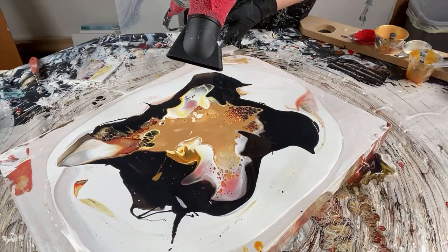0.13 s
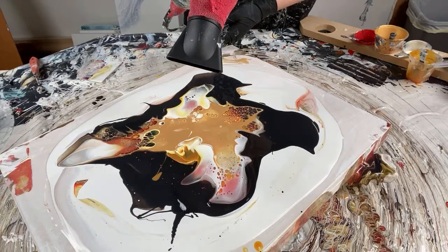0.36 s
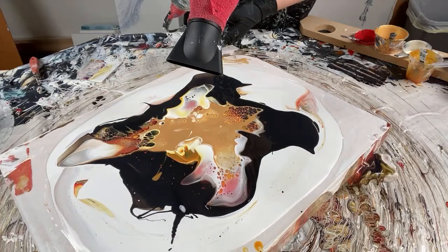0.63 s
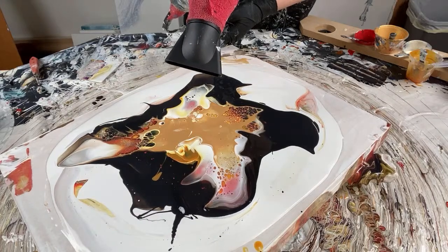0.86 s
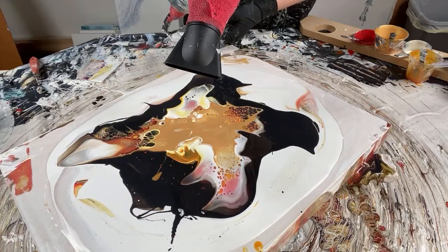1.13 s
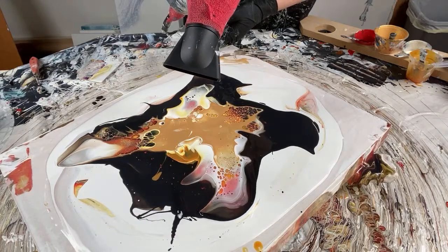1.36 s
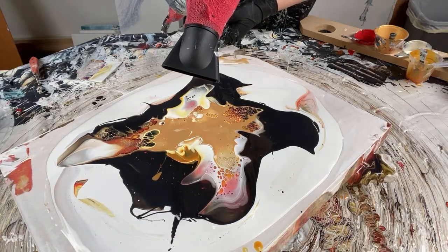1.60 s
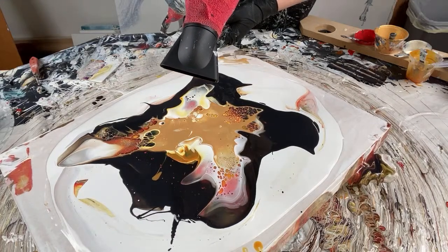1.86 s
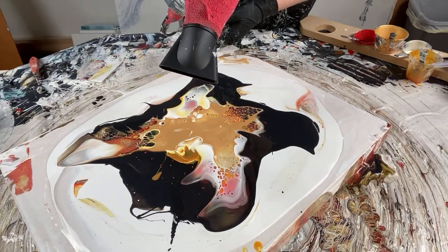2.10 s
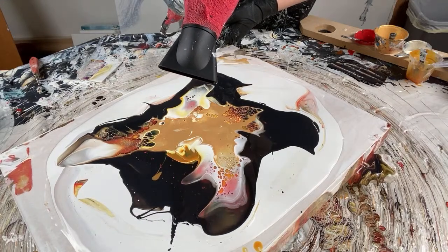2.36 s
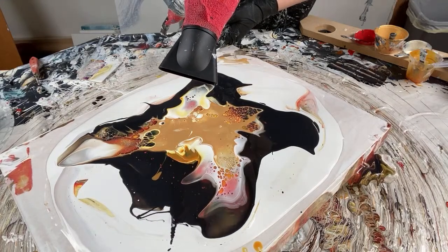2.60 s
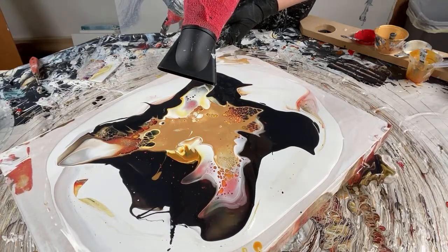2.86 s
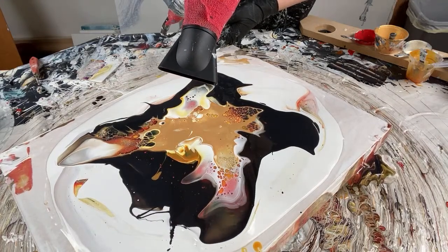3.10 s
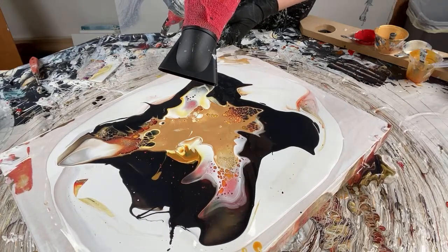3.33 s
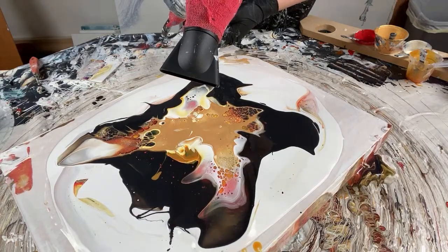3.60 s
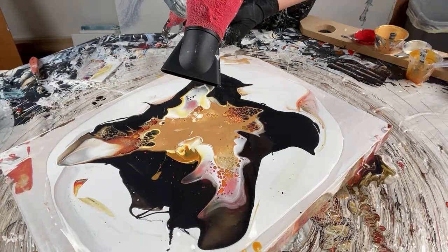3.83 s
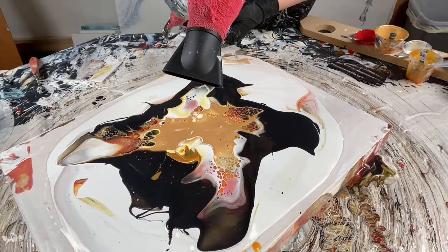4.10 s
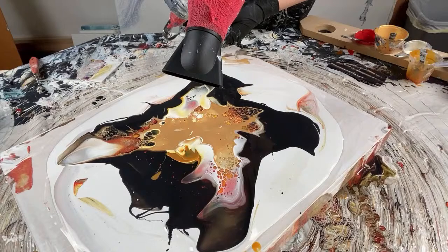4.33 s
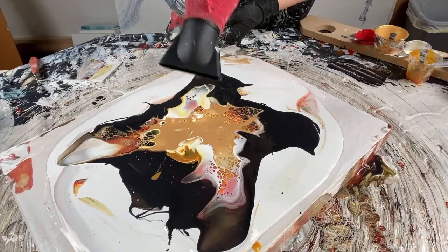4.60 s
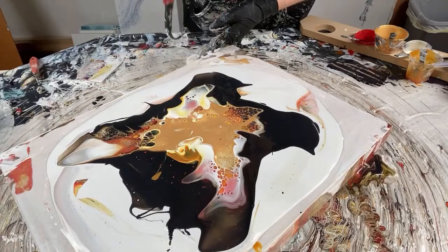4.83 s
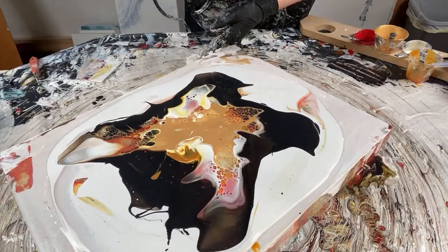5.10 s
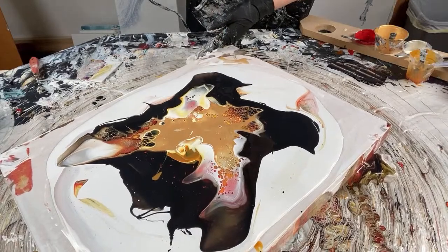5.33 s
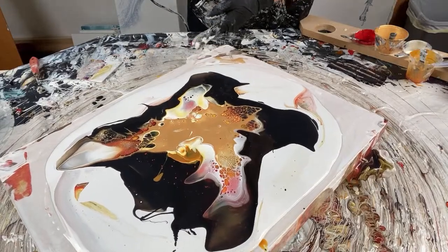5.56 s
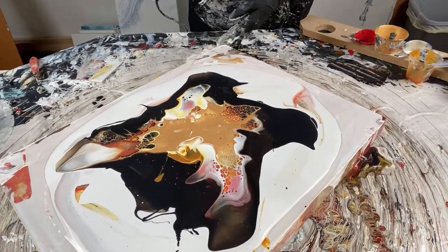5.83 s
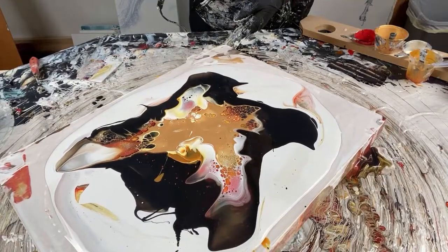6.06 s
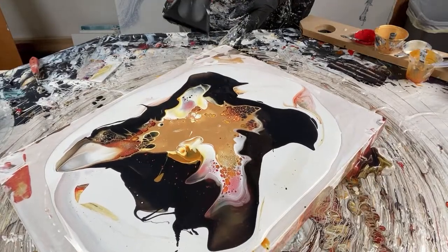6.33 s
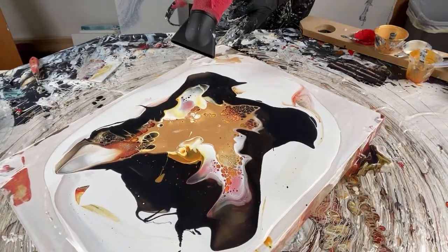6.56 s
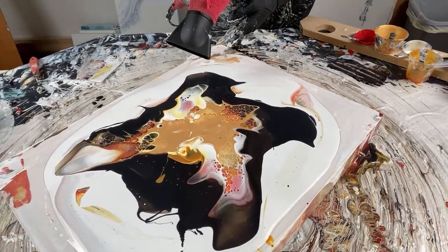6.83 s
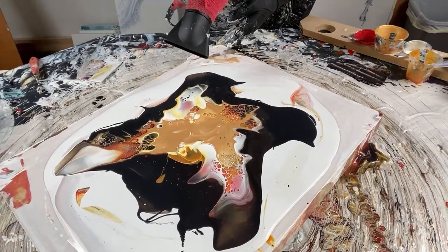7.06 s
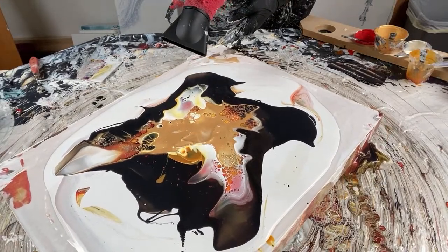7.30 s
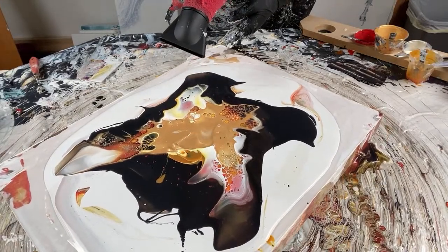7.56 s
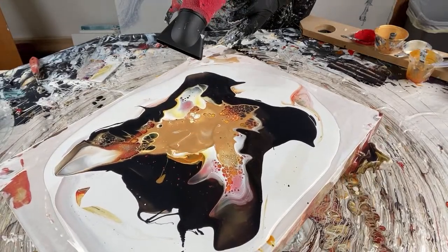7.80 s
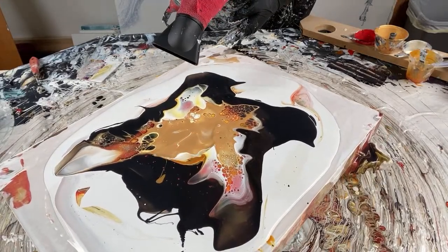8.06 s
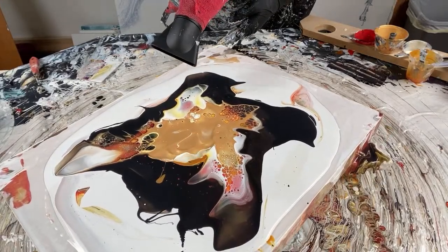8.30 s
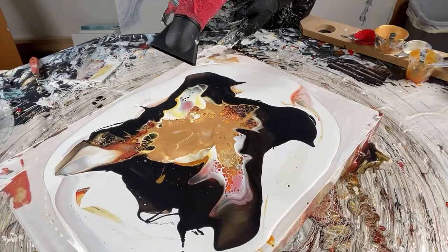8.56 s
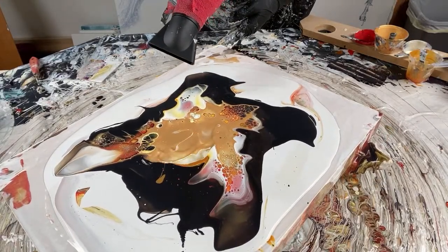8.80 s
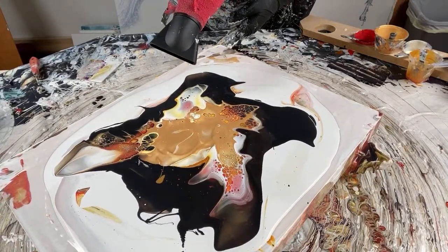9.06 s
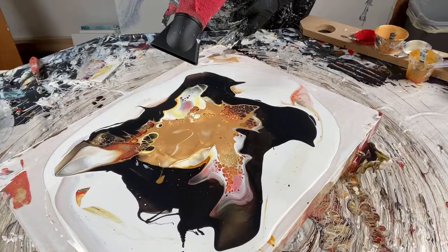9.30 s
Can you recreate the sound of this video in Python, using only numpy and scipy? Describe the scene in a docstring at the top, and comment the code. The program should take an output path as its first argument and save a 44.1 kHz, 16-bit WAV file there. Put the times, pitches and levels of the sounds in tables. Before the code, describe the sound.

A handheld hair dryer runs without pause in a small studio. Its hollow midrange roar and airy hiss stay steady for over four seconds, swell slightly and slide in tone as the nozzle swings away, then settle into a different colour and gradually soften. Faint motor whine, low fan rumble and barely audible mains hum sit beneath, heard by one centred microphone with a short room reverberation.

```python
"""A handheld hair dryer blows at a wet canvas on a table in a small studio, heard by one microphone.
It holds its first aim, is swung up and away, then is aimed again from another angle and slowly draws back.
Throughout, turbulence roars in the barrel's resonances and hisses in the jet, coloured by each attitude.
The motor whines faintly on multiples of its shaft speed, over a low fan rumble and a steady mains hum."""
import sys
import numpy as np
from scipy import signal
from scipy.io import wavfile
from scipy.ndimage import uniform_filter1d

SR = 44100
rng = np.random.default_rng(int(sys.argv[2]) if len(sys.argv) > 2 else 0)


def dump(signal):
    """Clip the signal to [-1, 1] and save it as 16-bit WAV at the path in sys.argv[1]."""
    limited = np.clip(np.atleast_2d(signal).T, -1, 1)
    pcm = np.round(limited * 32767).astype(np.int16)
    wavfile.write(sys.argv[1], SR, pcm)


def makeup_ratio(level_db):
    """Linear amplitude ratio for a level in decibels (20 dB per factor of ten)."""
    decades = np.asarray(level_db, float) / 20
    return 10 ** decades


N = 415422   # length in samples

# relative spectra of the barrel roar, one each for first aim, swung away, second aim: pitch_hz, level_db
ROAR_SPECTRA = [
    [(180, -47), (300, -22.5), (448, -6), (623, 0.5), (754, -3), (860, -3.5), (938, -8), (1350, -5.5),
     (1670, -16), (2000, -9), (2400, -25), (3120, -56), (5280, -120)],
    [(180, -47), (300, -20.5), (425, -11), (506, -0.5), (602, 1), (680, -4), (1390, -4.5), (1590, -13.5),
     (1930, -8.5), (2400, -20.5), (3120, -50), (5280, -120)],
    [(180, -52), (300, -20.5), (376, -21), (444, -9), (476, -18), (556, 0), (795, -0.5), (980, -12),
     (1080, -8.5), (2320, -18), (2400, -18.5), (3120, -51), (5280, -120)],
]
# relative spectra of the jet hiss, one each for first aim, swung away, second aim: pitch_hz, level_db
HISS_SPECTRA = [
    [(1350, -39), (2300, -8), (2700, -2), (2920, -1), (3740, -3.5), (4680, 1.5), (5230, 0), (5670, -4),
     (6390, -1), (7920, -9.5), (8930, -11), (11100, -16), (12500, -13.5), (13700, -17.5), (15500, -39)],
    [(1350, -31), (2300, -5), (2470, 1), (2850, -13), (2990, -3), (3430, -7), (4640, -4), (5070, -5),
     (6590, -4), (8310, -4.5), (10700, -16.5), (13900, -19), (15500, -29)],
    [(1350, -34), (2300, -24), (2530, 6), (2760, -3.5), (3140, -2.5), (3680, -7), (3990, -2.5), (4320, -6),
     (6490, -3.5), (7670, -7), (8380, -1), (9370, -14), (13100, -21), (14400, -19), (15500, -29)],
]
# narrow ridges and hollows of barrel and table: centre_hz, width_hz, first_db, away_db, second_db
BARREL_RIDGES = [(443, 18, 2, -4, 0.5), (617, 41, 1.5, -1.5, -2.5), (860, 15, 3.5, -4.5, -3.5),
                 (1050, 58, 0.5, -2, 0.5), (1326, 29, 2, -1, 0.5), (1800, 58, -5, -3, -3),
                 (2050, 25, 3.5, -5, 4.5), (2102, 36, -6.5, 5.5, -2.5), (2260, 55, -2.5, -5, -8),
                 (2550, 45, 3, 0.5, 2.5), (2750, 50, 0.5, 7.5, -1.5), (2960, 110, 3, -1, 1)]
# ridges (+) and hollows (-) that glide while the nozzle swings and the echo off the table changes its path:
# start_s, end_s, from_hz, to_hz, level_db
GLIDING_RIDGES = [(4.4, 4.7, 2050, 1600, 3), (4.7, 6.34, 1140, 1360, 3), (5.2, 6.05, 1000, 1050, 1.5),
                  (4.78, 5.22, 10300, 15200, 6), (4.85, 5.2, 2700, 3000, -5), (5.1, 5.62, 3350, 3670, -7),
                  (5.1, 5.75, 7900, 8600, 2), (5.0, 5.8, 6200, 7100, 3), (5.3, 6.3, 15000, 8400, 4),
                  (5.3, 7.6, 8800, 8250, 3), (5.75, 6.8, 14400, 11000, 4), (5.8, 6.6, 456, 890, 3.5),
                  (5.76, 6.15, 2400, 2700, 5.5), (6.0, 6.45, 2750, 3200, 1), (5.85, 6.5, 1620, 2040, 4)]
# motor and fan whine: multiple (of the shaft speed), first_db, second_db
WHINE_TONES = [(1, -63, -64), (9, -62, -55), (10, -61, -61), (12, -65, -63), (18, -62, -62), (24, -68, -64),
               (27, -63, -65), (36, -67, -64)]
# relative spectrum of the fan's low rumble: pitch_hz, level_db
RUMBLE_SPECTRUM = [(24, -36), (45, -32), (85, -16.5), (140, -7.5), (220, -0.5), (300, -0.5), (360, -2.5),
                   (500, -27.5)]
# mains hum: pitch_hz, level_db
HUM_TONES = [(60, -71), (120, -64)]

# loudness by attitude, in dB: first aim, swung away, second aim
ROAR_DB, HISS_DB, RUMBLE_DB = (-27, -23.5, -25.5), (-34.8, -34.5, -35), (-48, -46, -48.5)
# the swing: lifted off, furthest away, starting back, settled again
LIFT_S, FURTHEST_S, BACK_S, SETTLE_S = 4.7, 5.36, 5.47, 6.45
# the turn into the second aim: begins, complete; the share of that aim then held
TURN_S, AIMED_S, AIM_SHARE = 5.88, 6.25, 0.58
SINK_DB_PER_S = 0.37    # once settled, the dryer slowly draws back
RUMBLE_LAG_S = 0.31     # the rumble swells later than the roar
GLIDE_WIDTH = 0.048     # share of the centre frequency
GLIDE_FADE = 0.16       # share of its length over which a glide fades in, and out
RIPPLE = 0.045          # share by which the mains ripples the hiss
SHAFT_HZ = 243.9
ROOM_DB, ROOM_T60_S, WALL_CUT_HZ = -13, 0.41, 7100
NOTCH_HZ, NOTCH_WIDTH_HZ, NOTCH_DB = 7830, 180, -4
FRAME = 2048            # samples per spectral frame, overlapping by three quarters


def barrel_roar(t):
    """Resonance: the barrel reinforces some bands of the turbulence blown through it."""
    level_db = by_attitude(*ROAR_DB, t) - sink_db(t)
    return air(ROAR_SPECTRA, level_db, ridges_db, gust_db=0.43)


def jet_hiss(t):
    """Jet noise: turbulent mixing radiates a broad treble, amplitude-modulated at the mains frequency."""
    level_db = by_attitude(*HISS_DB, t) - sink_db(t)
    hiss = air(HISS_SPECTRA, level_db, ridges_db, gust_db=0.45)
    mains_hz = HUM_TONES[0][0]
    return hiss * (1 + RIPPLE * np.sin(2 * np.pi * mains_hz * t))


def motor_whine(t):
    """Harmonics of rotation: an unsteady shaft drives tones that swell and fade as the hand moves."""
    shaft_hz = SHAFT_HZ * (1 + 0.000586 * drift(1.5, size=N))
    turns = np.cumsum(shaft_hz) / SR
    share_second = attitude(t)[1]
    whine = np.zeros(N)
    for multiple, first_db, second_db in WHINE_TONES:
        level_db = first_db + share_second * (second_db - first_db) + 2.7 * drift(1.5, size=N)
        phase = 2 * np.pi * (round(multiple) * turns + rng.random())
        whine += np.sqrt(2) * makeup_ratio(level_db) * np.sin(phase)
    return whine


def fan_rumble(t):
    """Low-frequency flow noise: one spectrum serves every attitude, and only its level follows the swing."""
    level_db = by_attitude(*RUMBLE_DB, t - RUMBLE_LAG_S)
    return air([RUMBLE_SPECTRUM] * 3, level_db, lambda hz, s: 0, gust_db=0.2)


def mains_hum(t):
    """Mains induction: steady sinusoids, their levels given as rms."""
    return sum(np.sqrt(2) * makeup_ratio(db) * np.sin(2 * np.pi * hz * t) for hz, db in HUM_TONES)


def studio(x):
    """Reverberation: a dense, exponentially dying tail joins the direct sound and ripples its spectrum."""
    t = np.arange(SR // 2) / SR
    tail = rng.standard_normal(len(t)) * makeup_ratio(-60 * t / ROOM_T60_S)
    tail = tail * (t > 0.004)   # the tail starts after the direct sound
    # the walls absorb the treble
    tail = signal.lfilter([1], [1, -np.exp(-2 * np.pi * WALL_CUT_HZ / SR)], tail)
    tail = makeup_ratio(ROOM_DB) * tail / np.sqrt(np.sum(tail ** 2))
    led_in = np.r_[x[len(t):0:-1], x]   # so the room is already ringing at the start
    wet = signal.fftconvolve(led_in, tail)[len(t):len(t) + N]
    return x + wet


def air(spectra, level_db, lift_db, gust_db, patchy_db=0.5):
    """Filtered turbulence: white noise takes a colour that blends between the three attitudes."""
    overlap = FRAME * 3 // 4
    hz, s, white = signal.stft(rng.standard_normal(N), SR, nperseg=FRAME, noverlap=overlap)
    spectra_db = [at_hz(points, hz)[:, None] for points in spectra]
    colour = makeup_ratio(by_attitude(*spectra_db, s) + lift_db(hz[:, None], s))
    colour = colour / np.sqrt(np.mean(colour ** 2, axis=0))   # the colour leaves the level alone
    colour = colour * makeup_ratio(patchy_db * eddies(colour.shape))
    noise = signal.istft(white * colour, SR, nperseg=FRAME, noverlap=overlap)[1][:N]
    return noise * makeup_ratio(level_db + gust_db * drift(60, size=N))   # the flow flutters


def ridges_db(hz, s):
    """Interference and resonance: the gliding ridges fade in and out over the fixed ones."""
    out = barrel_db(hz, s)
    for start_s, end_s, from_hz, to_hz, top_db in GLIDING_RIDGES:
        done = np.clip((s - start_s) / (end_s - start_s), 0, 1)
        centre_hz = from_hz + done * (to_hz - from_hz)
        fade = np.minimum(np.minimum(done, 1 - done) / GLIDE_FADE, 1)
        out = out + top_db * fade * bell(hz, centre_hz, GLIDE_WIDTH * centre_hz)
    return out


def barrel_db(hz, s):
    """Directivity: each fixed ridge or hollow is as strong as the attitude lets it reach the microphone."""
    return sum(bell(hz, centre_hz, width_hz) * by_attitude(*db, s)
               for centre_hz, width_hz, *db in BARREL_RIDGES)


def bell(hz, centre_hz, width_hz):
    """Gaussian resonance shape: a bump of height 1."""
    return np.exp(-0.5 * ((hz - centre_hz) / width_hz) ** 2)


def attitude(s):
    """Piecewise-linear motion: the share swung away (out and back) and the share of the second aim."""
    away = np.interp(s, [LIFT_S, FURTHEST_S, BACK_S, SETTLE_S], [0, 1, 1, 0])
    second = np.interp(s, [TURN_S, AIMED_S], [0, AIM_SHARE])
    return away, second


def by_attitude(first, away, second, s):
    """Linear interpolation: a value blended between the three attitudes."""
    share_away, share_second = attitude(s)
    return first + share_away * (away - first) + share_second * (second - first)


def sink_db(t):
    """Attenuation with distance: a steady loss in dB as the settled dryer draws back."""
    return SINK_DB_PER_S * np.maximum(t - SETTLE_S, 0)


def at_hz(points, hz):
    """Spectral interpolation: levels in dB are joined by straight lines on a log-frequency axis."""
    points_hz, points_db = np.array(points).T
    return np.interp(np.log(hz + 1), np.log(points_hz), points_db)


def drift(rate, size):
    """Slow random modulation: straight lines join unit-spread chance values, 2 * rate of them a second."""
    knots = rng.standard_normal(int(N / SR * rate * 2) + 2)
    return np.interp(np.linspace(0, len(knots) - 1, size), np.arange(len(knots)), knots)


def eddies(shape):
    """Coherence of turbulence: chance patches about 1 kHz wide and 50 ms long, of spread 1."""
    patches = uniform_filter1d(rng.standard_normal(shape), size=48, axis=0)
    patches = uniform_filter1d(patches, size=4, axis=1)
    return patches / patches.std()


def scene():
    """Superposition: all sources add at a single point, the same in both channels."""
    t = np.arange(N) / SR
    in_room = studio(barrel_roar(t) + jet_hiss(t) + motor_whine(t))
    mix = in_room + fan_rumble(t) + mains_hum(t)
    return np.tile(mix, (2, 1))


def band_limit(x):
    """A steep low-pass at the top of the band."""
    return signal.sosfilt(signal.butter(12, 15640, fs=SR, output="sos"), x)


def record(dry):
    """Narrow dip: subtracting part of a narrow resonance leaves a dip in the treble."""
    b, a = signal.iirpeak(NOTCH_HZ, NOTCH_HZ / NOTCH_WIDTH_HZ, fs=SR)
    resonance = signal.lfilter(b, a, dry)
    heard = dry - (1 - makeup_ratio(NOTCH_DB)) * resonance
    return band_limit(heard)


dry = scene()
out = record(dry)
dump(out)
```